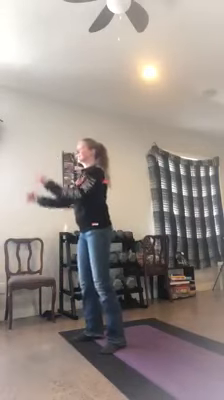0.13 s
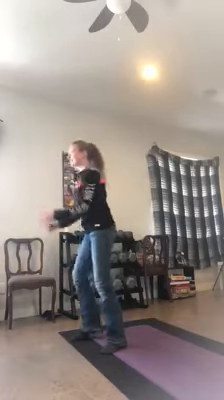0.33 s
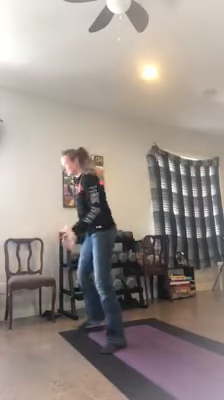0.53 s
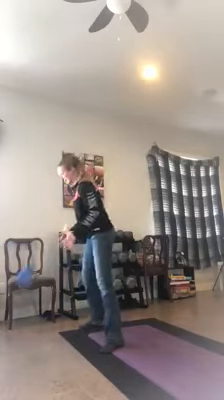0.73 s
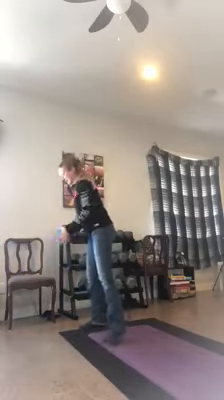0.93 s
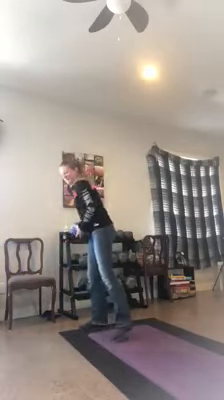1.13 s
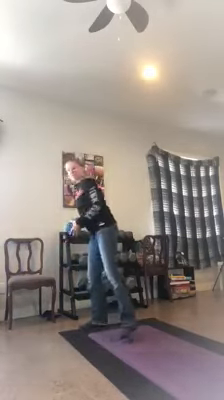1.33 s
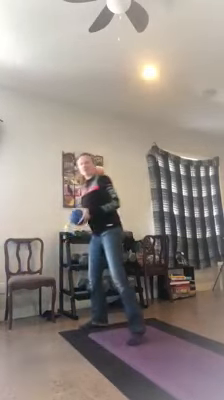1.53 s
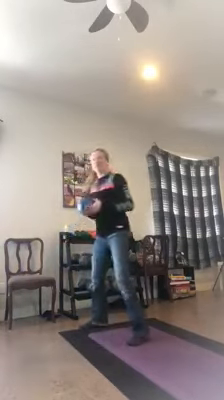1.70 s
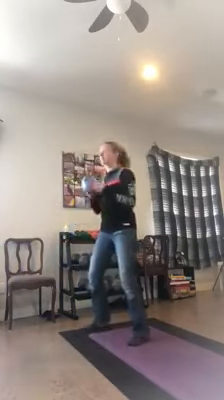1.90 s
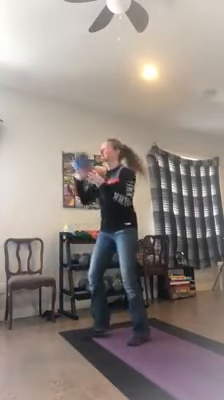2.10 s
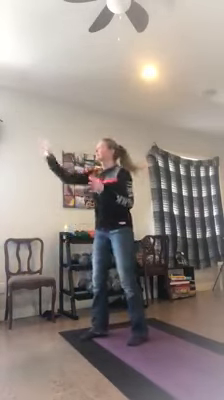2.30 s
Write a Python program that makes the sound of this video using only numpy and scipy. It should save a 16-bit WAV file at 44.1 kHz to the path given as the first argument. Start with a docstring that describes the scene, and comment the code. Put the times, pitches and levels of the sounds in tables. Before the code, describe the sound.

A rubber ball smacks a wall, bounces on the floor and is softly caught indoors.

```python
"""Rubber ball against a wall

In a hard-floored home room a ball hits the wall, bounces on the floor and is caught by one hand, then the other.
Each hit is a band-passed crack, a smack ringing the ball's modes and a noise tail dying by band.
Wall, floor and catch also swell into low room modes. A shoe scuffs, a sleeve rustles and feet shift, made from
friction noise and dull modes, over noise room tone and a wavering mains hum. One microphone takes it all.
"""
import sys
import numpy as np
from scipy import signal
from scipy.io import wavfile

SR = 44100
rng = np.random.default_rng(int(sys.argv[2]) if len(sys.argv) > 2 else 0)


def digitize_waveform(pressure):
    """Quantize a signal to 16-bit integers and store it at the path in sys.argv[1].

    Rows of a 2-D input are taken as channels; values are limited to [-1, 1].
    """
    field = np.atleast_2d(pressure).T
    bounded = np.clip(field, -1, 1)
    quanta = np.round(bounded * 32767).astype(np.int16)
    wavfile.write(sys.argv[1], SR, quanta)


N = 103635

# The hits, in order wall, floor, first hand, second hand: t/s, crack drive level/dB, smack drive level/dB,
# early reflections above the tail level/dB, then the tail's level/dB per Hz in eight bands, bass to treble
HITS = [(0.2036, -12, -27.5, 4.5, -54.5, -57.5, -58, -61.5, -66, -68, -69, -75),
        (0.6722, 2.5, -25.5, 5, -59.5, -62.5, -71, -63, -67.5, -68.5, -69.5, -74),
        (.9893, -30, -36, 7, -95, -81, -87, -85, -93, -89, -91, -98),
        (1.0391, -28, -31.5, 7, -83, -75.5, -85, -81, -77.5, -80.5, -87.5, -93)]
# How long the room rings at each pitch: f/Hz, time to fall 60 dB t/s
TAIL_T60 = [(100, 0.83), (200, 0.71), (420, 0.59), (1100, 0.64), (2900, 0.6), (7000, 0.45), (14000, .25)]


def amp(db):
    """dB to gain."""
    return 10 ** (np.asarray(db) / 20)


def rms_one(x):
    """Scale to rms 1."""
    return x / np.sqrt(np.mean(x ** 2) + 1e-20)


def curve(rows):
    """A (t/s, level/dB) curve as gain, silent outside its times."""
    s, db = np.transpose(rows)
    return amp(np.interp(np.arange(N) / SR, s, db, left=-150, right=-150))


def at_hz(points, hz):
    """Read a table on a log frequency axis."""
    table = np.array(points)
    return np.interp(np.log(hz), np.log(table[:, 0]), table[:, 1])


def band_pass(x, order, low_hz, high_hz):
    """Butterworth band-pass; the tiny offset avoids denormal numbers."""
    sos = signal.butter(order, [low_hz, high_hz], "band", fs=SR, output="sos")
    return signal.sosfilt(sos, x + 1e-18)


def bank(gain, low_hz):
    """Third-octave bands of noise, each shaped by gain(Hz) before its filter."""
    edges = low_hz * 2 ** np.arange(0, np.log2(18000 / low_hz), 1 / 3)
    white = rng.standard_normal((2, N))  # neighbouring bands use different noise
    out = 0
    for k, (low, high) in enumerate(zip(edges, edges[1:])):
        out = out + band_pass(white[k % 2] * gain(np.sqrt(low * high)), 2, low, high)
    return out


def flutter(spread_db, hold):
    """A random gain, redrawn every hold samples."""
    steps = rng.standard_normal(N // hold + 1)
    return amp(spread_db * np.repeat(steps, hold)[:N])


def swell_in(t, swell_s):
    """A smooth rise from 0 towards 1."""
    return 1 - np.exp(-(t / swell_s) ** 2)


def decaying_sine(t, hz, t60):
    """One mode, falling 60 dB in t60 seconds."""
    return amp(-60 * t / t60) * np.sin(2 * np.pi * hz * t)


def cracks():
    """A bright spike at each contact, with a few echoes."""
    # Echoes of the crack: lag t/s, level/dB
    echoes = [(.0031, -13.5), (.0098, -22.5), (0.039, -15.5)]
    x = np.zeros(N)
    for s, db, *_ in HITS:
        for lag, loss_db in [(0, 0.0094)] + echoes:
            x[int((s + lag) * SR)] += amp(db + loss_db) * 2
    return band_pass(x, 3, 2310, 10900)


def ball():
    """Each smack rings the ball's modes; its reverberation lingers on the same pitches."""
    # The ball's modes: f/Hz, time to fall 60 dB t/s, then level/dB for wall, floor, first hand, second hand
    ball_modes = [(322, 0.04, -6.5, -5, -17, -6.5), (457, 0.037, -1.5, -1.5, -19, -6),
                  (574, 0.022, -3.5, -3, -6.5, -1.5), (676, 0.015, -29, -11, -3.5, -1.5),
                  (908, 0.038, -5, -4.5, -8.5, -23), (1563, 0.036, -3, -5, -12, -21),
                  (1739, 0.013, -8.5, -8, -24, -3), (2370, 0.024, -4, -8, -22, -11),
                  (2770, 0.014, -7, -21, -1, -46), (4260, .02, -10, -7, -13, -8),
                  (6720, 0.011, -7, -19, -7.5, -28), (7595, 0.02, 0.5, -2.5, -20, -33)]
    linger_db = -30  # noise drive from the room, relative to the smack
    out = 0
    for hz, t60, *mode_db in ball_modes:
        drive, noise = np.full(N, 1e-18), rng.standard_normal(N)
        for (s, _, smack_db, *_), db in zip(HITS, mode_db):
            i = int(s * SR)
            fall_db = 60 * np.arange(N - i) / SR / at_hz(TAIL_T60, hz)
            drive[i] += amp(smack_db + db)
            drive[i:] += noise[i:] * amp(smack_db + db + linger_db - fall_db)
        # two-pole resonator: pole radius sets the decay, pole angle the pitch
        radius, angle = amp(-60 / (t60 * SR)), 2 * np.pi * hz / SR
        poles = [1, -2 * radius * np.cos(angle), radius * radius]
        out = out + signal.lfilter([0, np.sin(angle)], poles, drive)
    return out


def booms():
    """Wall, floor and catch swell into the same low room modes, with heights set by where the hit lands."""
    # Onsets for the wall, the floor and the hands: t/s, swell t/s
    boom_times = [(.2126, .012), (.6864, .012), (1.042, .012)]
    # Low room modes: f/Hz, time to fall 60 dB t/s, signed amplitude struck from the wall, the floor, the hands
    room_modes = [(33.2, 0.75, 0.007, -0.0, 0.0), (47.2, 0.62, 0.019, 0.014, -0.002),
                  (53.5, 0.38, -0.091, -0.004, 0.001), (61.5, 0.4, 0.024, -0.03, -0.0),
                  (67.2, 0.7, -0.03, -0.005, -0.001), (73.8, 0.27, 0.085, 0.067, 0.009),
                  (86.8, 0.32, 0.02, -0.032, 0.005), (91.8, 0.9, -0.017, -0.001, 0.0),
                  (101.0, 0.2, 0.03, -0.024, -0.003), (129.2, 0.2, 0.035, -0.013, 0.002),
                  (137.8, 0.9, -0.007, -0.001, 0.0), (189, 0.4, -0.015, 0.008, -0.016),
                  (212, 0.45, 0.02, 0.02, 0.004), (228, 0.3, 0.012, -0.015, 0.002),
                  (280, 0.3, 0.012, -0.008, -0.012)]
    out = 0
    for k, (s, swell_s) in enumerate(boom_times):
        t = np.maximum(np.arange(N) / SR - s, 0)
        modes = sum(height[k] * decaying_sine(t, hz, t60) for hz, t60, *height in room_modes)
        out = out + swell_in(t, swell_s) * modes
    return out


def tails():
    """The room's answer to each hit: noise that swells, slower in the bass, then dies by band."""
    # Centres of the tail level columns in HITS: f/Hz
    tail_hz = [60, 110, 200, 450, 1000, 2500, 6000, 12000]
    build_cycles, build_s = 0.28, 0.00078  # swell time: cycles of the band plus seconds
    early_s = 0.037  # fade time of the first reflections above the tail
    lead_s = 0.0018  # the tail starts a little before the crack

    def gain(hz):
        power = 0
        for s, _, _, early_db, *colour in HITS:
            t = np.maximum(np.arange(0, N, 8) / SR - s + lead_s, 0)  # every 8th sample is enough
            db = at_hz(list(zip(tail_hz, colour)), hz) - 60 * t / at_hz(TAIL_T60, hz)
            db = db + early_db * np.exp(-t / early_s)
            swell = 1 - np.exp(-t / (build_s + build_cycles / hz))
            power = power + (amp(db) * swell) ** 2
        return np.repeat(np.sqrt(power * SR / 2), 8)[:N]  # level per Hz to white-noise gain

    return bank(gain, low_hz=44.28)


def steps():
    """Soft foot knocks, each a set of dull modes that swell in and die away."""
    # Knocks: t/s, level/dB
    knocks = [(1.605, -63.5), (2.208, -59), (2.243, -65)]
    # Modes of a knock: f/Hz, level/dB, time to fall 60 dB t/s
    step_modes = [(62.4, -2.5, 0.22), (323.7, -18.5, 0.086), (476, 4, 0.19), (553, -3, 0.2),
                  (889, -13.5, 0.055), (1283, -4.5, 0.065)]
    out = 0
    for s, level_db in knocks:
        t = np.maximum(np.arange(N) / SR - s, 0)
        modes = sum(amp(db) * decaying_sine(t, hz, t60) for hz, db, t60 in step_modes)
        out = out + amp(level_db) * swell_in(t, 0.0067) * modes
    return out


def scuff_and_rustle():
    """Shoe on the mat and sleeve in the throw: coloured friction noise with a grainy level."""
    # Shoe scuff: t/s, level/dB
    scuff = [(1.55, -107), (1.596, -94), (1.608, -80), (1.814, -70), (1.836, -59), (1.868, -59),
             (1.922, -70), (2.0, -82.5)]
    # Sleeve rustle: t/s, level/dB
    rustle = [(2.16, -101), (2.23, -74), (2.3, -72.5), (2.35, -77)]
    # Colour of both, relative: f/Hz, level/dB per Hz
    scuff_colour = [(470, -16.5), (800, -7), (2770, -4), (3340, -6), (4460, -5), (12900, -12), (16000, -10)]
    friction = rms_one(bank(lambda hz: amp(at_hz(scuff_colour, hz)), low_hz=476))
    return friction * flutter(1.25, hold=150) * (curve(scuff) + curve(rustle))


def shuffle():
    """Feet shifting: grainy noise kept to a dull band."""
    # Shuffle: t/s, level/dB
    shuffle_level = [(1.5, -82.5), (1.58, -77), (1.62, -71), (1.68, -72.5), (1.94, -70.5), (2.0, -95),
                     (2.19, -84.5), (2.22, -66.5), (2.35, -82)]
    grains = rng.standard_normal(N) * flutter(1.2, hold=200)
    return rms_one(band_pass(grains, 2, 285.6, 870)) * curve(shuffle_level)


def room_tone():
    """Steady coloured noise and a mains hum of wavering level."""
    # Colour of the noise, relative: f/Hz, level/dB per Hz
    tone_colour = [(25, -37), (55, -22), (90, -19.5), (130, -13.5), (230, -22.5), (500, -22), (950, -31),
                   (1400, -32.5), (3000, -36.5), (7300, -40), (10000, -41), (15200, -41)]
    tone_db, hum_hz, hum_db, hum_waver_db = -67.5, 119.3, -67, -1
    noise = rms_one(bank(lambda hz: amp(at_hz(tone_colour, hz)), low_hz=22.97))
    slow = np.interp(np.arange(N), np.linspace(0, N, 40), rng.standard_normal(40))
    sine = np.sqrt(2) * np.sin(2 * np.pi * hum_hz * np.arange(N) / SR)  # rms 1
    return amp(tone_db) * noise + amp(hum_db + hum_waver_db * slow) * sine


def scene():
    """All sources, one microphone."""
    hits = cracks() + ball() + booms() + tails()
    movement = steps() + scuff_and_rustle() + shuffle()
    return (hits + movement + room_tone())[None]


def record(dry):
    """The microphone's treble drops to a lower shelf, then the top is cut."""
    step_down_hz, step_end_hz, cutoff_hz = 7970, 8720, 16800
    # the shelf's zeros and poles are the poles of two low-passes
    zeros = signal.butter(6, step_end_hz, fs=SR, output="zpk")[1]
    poles = signal.butter(6, step_down_hz, fs=SR, output="zpk")[1]
    unity = (np.prod(1 - poles) / np.prod(1 - zeros)).real  # leaves the bass unchanged
    shelved = signal.sosfilt(signal.zpk2sos(zeros, poles, unity), dry)
    return signal.sosfilt(signal.cheby2(12, 70, cutoff_hz, fs=SR, output="sos"), shelved)


dry = scene()
out = record(dry)
digitize_waveform(out)
```